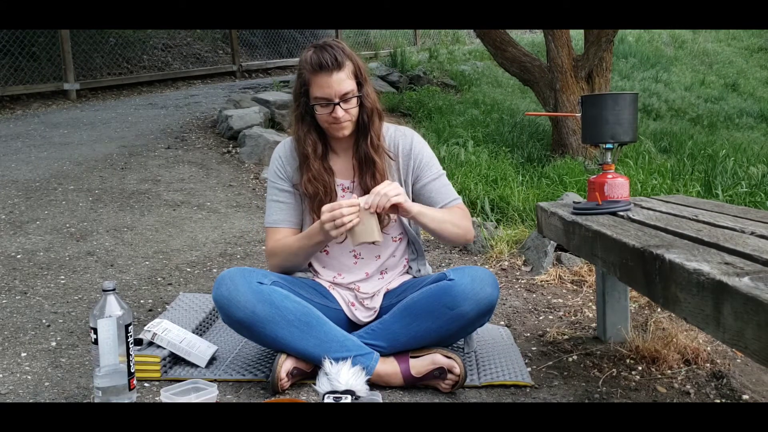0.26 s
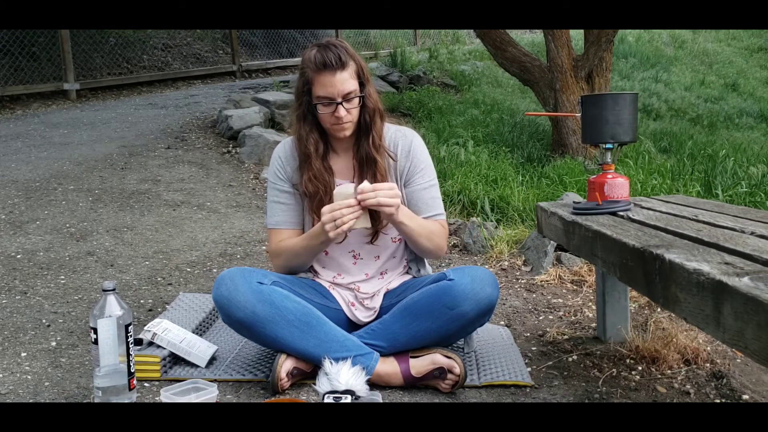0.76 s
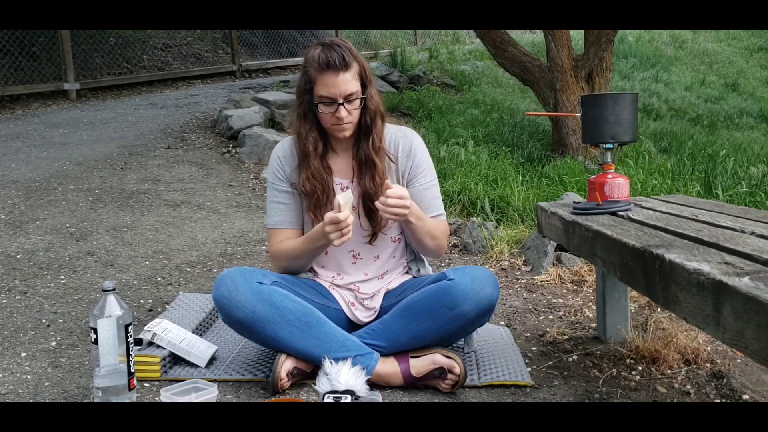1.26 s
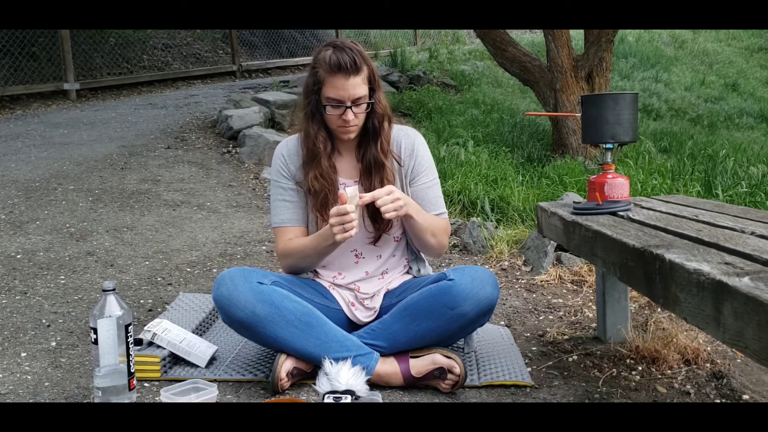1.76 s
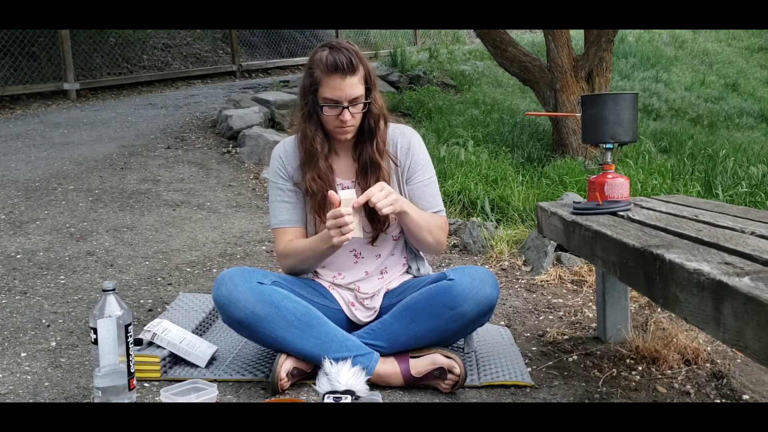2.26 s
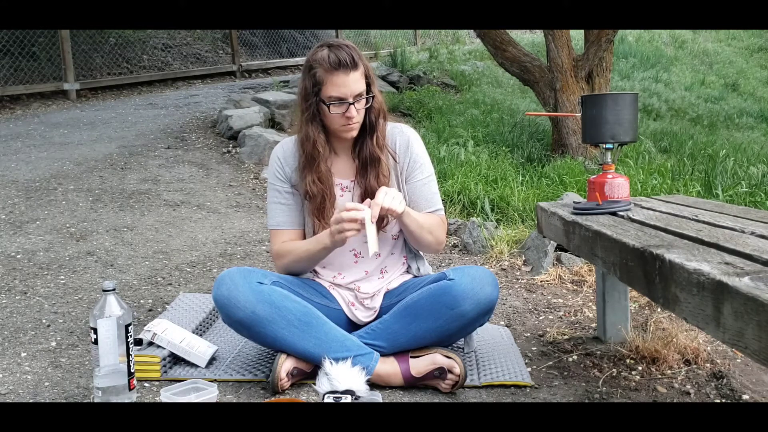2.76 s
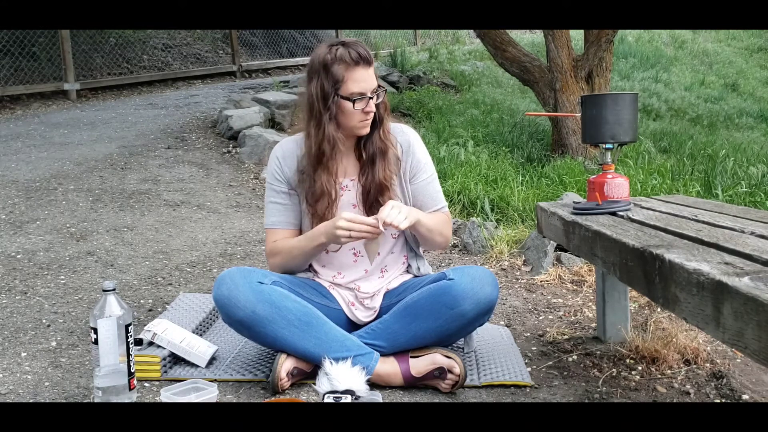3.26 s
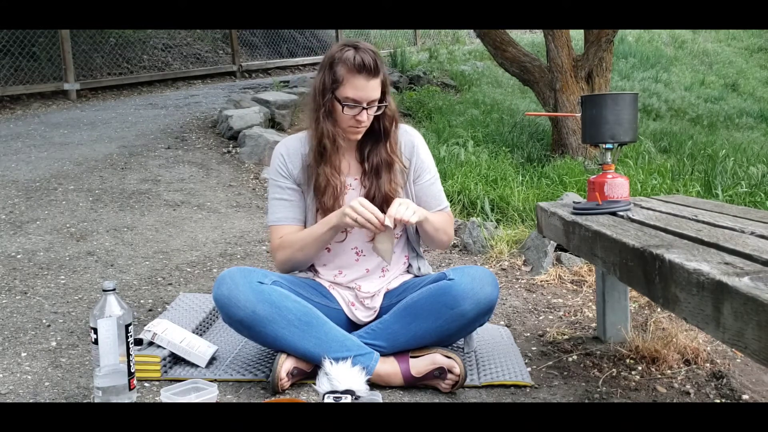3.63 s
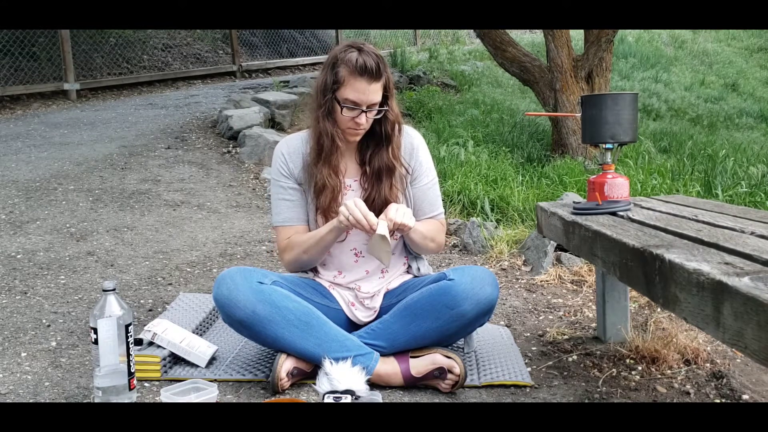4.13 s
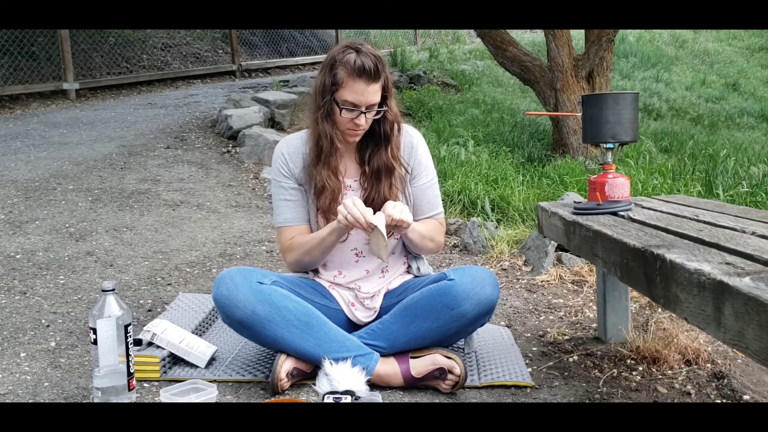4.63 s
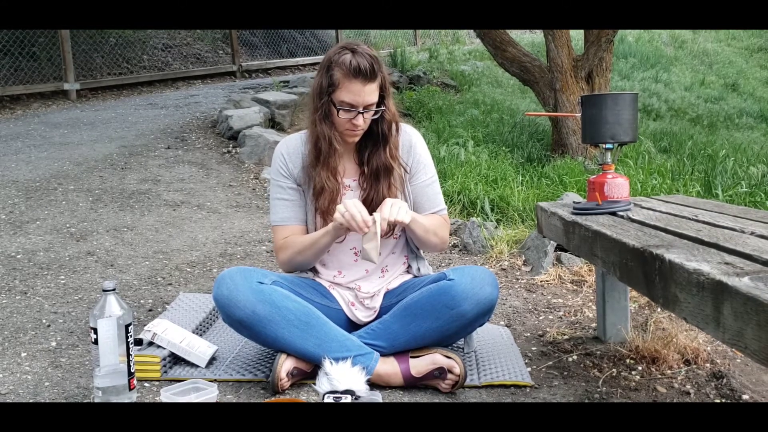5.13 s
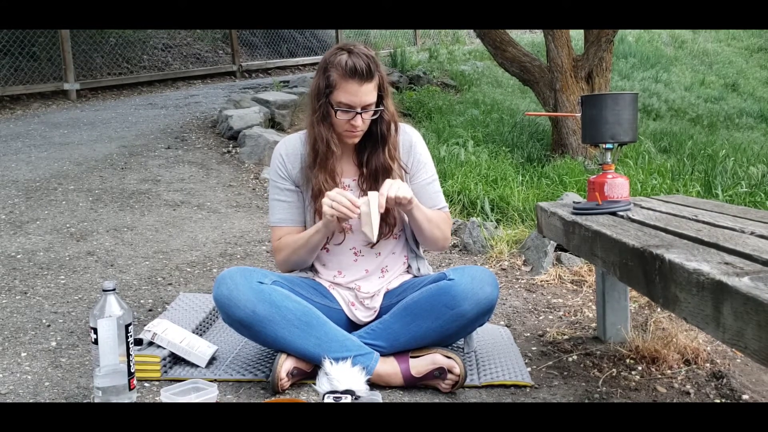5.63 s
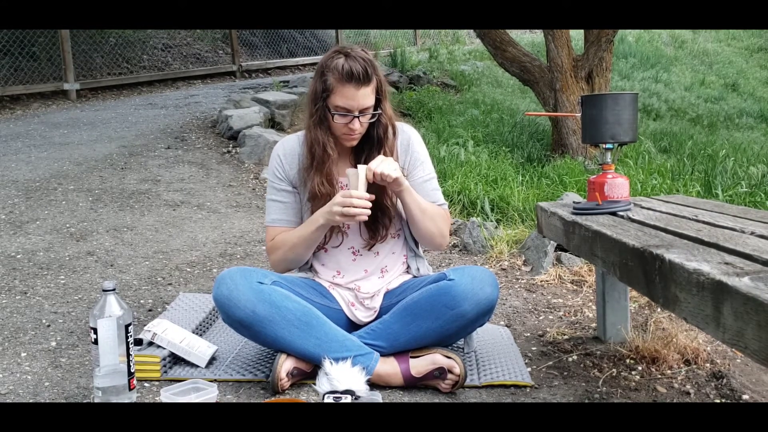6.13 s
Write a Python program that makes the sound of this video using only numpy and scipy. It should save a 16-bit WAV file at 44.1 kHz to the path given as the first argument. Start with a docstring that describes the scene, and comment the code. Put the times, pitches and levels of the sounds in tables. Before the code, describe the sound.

Fingers turn and tear a paper packet close by, with sharp crackles and faint rustles over the constant roar of a gas burner.

```python
"""Outdoors, a paper packet is turned in the fingers and torn open a little way from a stereo microphone.
Creases snap one by one: short noise bursts that ring the sheet. The packet knocks with dull thumps.
Fibres rip in short dense runs of noise, and sliding fingers rustle faintly.
Mostly to the right, a camping gas stove roars and hisses under a pot: three layers of coloured noise."""
import sys
import numpy as np
from scipy import signal
from scipy.fft import rfft, irfft
from scipy.io import wavfile
from scipy.ndimage import uniform_filter1d

SR = 44100
rng = np.random.default_rng(int(sys.argv[2]) if len(sys.argv) > 2 else 0)


def volts(x):
    """Linear amplitude factor 10**(x/20) for a level x in dB, scalar or array-like."""
    e = np.asarray(x, float) / 20
    return 10 ** e


def digitize_waveform(pressure):
    """Quantize a signal to 16-bit integers and store it at the path in sys.argv[1].

    Rows of a 2-D input are taken as channels; values are limited to [-1, 1].
    """
    field = np.atleast_2d(pressure).T
    bounded = np.clip(field, -1, 1)
    quanta = np.round(bounded * 32767).astype(np.int16)
    wavfile.write(sys.argv[1], SR, quanta)


N = 281793  # length in samples

# four bands of the paper's sound, from the dull body of the packet up to a bright tick:
# low edge f/Hz, high edge f/Hz, unshared (side) level/dB
PAPER_BANDS = [(197, 540, -19), (1097, 2660, -20.5), (2400, 7570, -11.5), (7580, 14150, -5)]


def colour(x, points):
    """Weights the spectrum of x by (f/Hz, level/dB) points."""
    hz, db = np.transpose(points)
    f = np.maximum(np.arange(N // 2 + 1) * SR / N, 1)
    gain_db = np.interp(np.log(f), np.log(hz), db)
    return irfft(rfft(x) * volts(gain_db), N)


def unit(x):
    """Scales the last axis to rms 1."""
    return x / np.sqrt(np.mean(x ** 2, axis=-1, keepdims=True))


def band(x, lo_hz, hi_hz, order=2):
    """Keeps the sound between two frequencies, along the last axis."""
    edges_hz = [lo_hz, min(hi_hz, .45 * SR)]
    return signal.sosfilt(signal.butter(order, edges_hz, "band", fs=SR, output="sos"), x)


def walk(rate):
    """A slowly wandering curve: random levels held 1 / rate s, then smoothed twice."""
    hold = int(SR / rate)
    steps = np.repeat(rng.standard_normal(N // hold + 1), hold)
    return 0.99 * uniform_filter1d(uniform_filter1d(steps, hold), hold)[:N]


def curve(rows):
    """Draws lines through the columns of a (t/s, value, ..) table, at every sample."""
    s, *columns = np.transpose(rows)
    return [np.interp(np.arange(N) / SR, s, c) for c in columns]


def ports(mid, side, side_db):
    """Makes left and right from a shared part and an unshared part."""
    return np.array([mid + volts(side_db) * side, mid - volts(side_db) * side])


def burner():
    """Gas flame under a pot: low flutter, roar against the pot and thin jet hiss, each swaying a little."""
    # spectra of the low flame flutter, the roar and the jet hiss: f/Hz, relative level/dB per Hz
    flame_points = [(15, 1), (30, -2), (54, -6), (100, -6.5), (170, 0.5), (220, 1), (300, -7.5), (430, -8),
                    (660, -16), (870, -8.5), (990, -16), (1300, -71)]
    roar_points = [(800, -50), (990, -9.5), (1150, -2.5), (1250, -2.5), (1520, 2.5), (1950, -0.5),
                   (2180, -2.5), (2400, 2), (2750, -3.5), (2980, -25), (3400, -68)]
    jet_points = [(2600, -40), (3000, 3), (3150, 3), (3900, 0.5), (4900, -6), (5400, -1.5), (5950, 6.5),
                  (6900, 1.5), (7600, 4.5), (8600, 2), (9700, 2.5), (10200, 9), (11200, -5.5), (15800, -19)]
    # spectrum, overall level/dB
    parts = [(flame_points, -53.5 + 0.54 * walk(9)),
             (roar_points, -53 + 0.62 * walk(10)),
             (jet_points, -56.5 + 1.2 * walk(9))]
    return sum(unit(colour(rng.standard_normal(N), points)) * volts(db) for points, db in parts)


def stove():
    """Direct burner noise, mostly stronger on the right, plus scattered sound the two sides do not share."""
    # balance of the direct sound: f/Hz, left minus right level/dB
    pan = [(60, -5.5), (1290, -2), (2380, -5), (4400, -3.5), (15000, 1.5)]
    # strength of the scattered sound: f/Hz, level/dB
    diffuse = [(30, -32), (60, -5), (250, -24.5), (640, -2.5), (1300, -25), (2200, -14), (3300, -19),
               (4500, -6), (15000, -9.5)]
    direct = burner()
    scattered = colour(burner(), diffuse)
    left = colour(direct, [(hz, db / 2) for hz, db in pan])
    right = colour(direct, [(hz, -db / 2) for hz, db in pan])
    return np.array([left + scattered, right - scattered])


def fibres(shape, scatter_db):
    """Noise of breaking fibres: most are faint, a few stand out."""
    return rng.standard_normal(shape) * volts(scatter_db * rng.exponential(size=shape))


def paper_band(x, k):
    """One band of the paper; neighbours alternate in sign so that they add where they meet."""
    lo_hz, hi_hz, _ = PAPER_BANDS[k]
    return (-1) ** k * unit(band(x, lo_hz, hi_hz))


def slides():
    """How hard the fingers work the packet: a smooth bump for each slide over a faint floor."""
    # fingers sliding on the packet: middle t/s, level/dB before the band shares, length t/s
    slide_rows = [(0.19, -61, 0.14), (0.427, -63.5, 0.17), (0.531, -57, 0.08), (0.692, -62, 0.048),
                  (1.097, -62, 0.052), (1.216, -59.5, 0.13), (1.321, -60, 0.088), (2.421, -60.5, 0.16),
                  (2.655, -57.5, .06), (2.85, -59.5, 0.15), (3.144, -58, 0.068), (3.426, -60, 0.2),
                  (3.729, -59.5, .05), (3.846, -60, .1), (3.981, -56.5, 0.11), (4.335, -50, 0.056),
                  (4.462, -60.5, 0.19), (4.922, -61, 0.085), (5.083, -58.5, 0.088), (6.281, -67, 0.086)]
    t = np.arange(N) / SR
    effort = volts(-75.5)
    for middle_s, db, length_s in slide_rows:
        effort = effort + volts(db) * np.exp(-(2 * (t - middle_s) / max(length_s, .01)) ** 2)
    return effort


def creases(count=50):
    """Time, four band levels and length of creases and thumps; faint creases crowd where fingers slide."""
    # creases that buckle: t/s, level/dB over 4 ms,
    # brightness (0 sheet ring, 1 crack, 2 tick), length t/ms
    snap_rows = [(.0126, -31.5, 8.5, 0.95), (.0158, -27.5, 0.1, 5.7), (.0787, -34, 1.5, 6),
                 (.099, -29, 0.9, 2.1), (.111, -25.5, 1.7, 1.8), (.2727, -41.5, -1.3, 3.3),
                 (.3343, -32.5, .7, 2.2), (.46, -41.5, 3, 2.2), (.495, -41, -1, 12),
                 (.5072, -29.5, 0.54, 5.2), (.5142, -29.5, 0.65, 1.15), (.5297, -41, -1, 1.6),
                 (.553, -34.5, 1.1, 1.7), (.573, -35.5, 0.5, 0.58), (.5896, -40, .5, 1.9),
                 (.679, -41.5, -0.4, 2.8), (.7521, -44.5, .1, 1.8), (.8271, -38.5, 2.2, 5.3),
                 (.8941, -36, 0.1, 2.5), (1.1159, -42.5, 0.5, 2.1), (1.1944, -48, 0, 1),
                 (1.2475, -47, 2.5, 1), (1.2926, -33.5, 1.2, 2.9), (1.321, -44, .8, 2),
                 (1.342, -42, 1.1, 1.5), (1.4098, -32, 1.0, 2.3), (1.4346, -44, 1, 1.8),
                 (1.4482, -37.5, 1.1, 1.9), (1.5047, -41.5, 8, 1.3), (2.1094, -37.5, 1.5, 1.54),
                 (2.3415, -46, 1.0, .9), (2.3842, -40, 1.5, 0.66), (2.4113, -39, 3, 2),
                 (2.435, -29, 2.5, 2.5), (2.5256, -39, 0.5, 4.5), (2.609, -40.5, 0.1, 0.53),
                 (2.6386, -35, 1.5, 3.8), (2.6639, -40.5, 0, 4.7), (2.7564, -33, 1.2, 0.95),
                 (2.787, -35, 1.5, 2), (2.8162, -27.5, 2.3, 1.6), (2.8478, -30, 1.5, 2.1),
                 (2.9015, -36, 1.3, 3.1), (3.044, -28, 1.44, 2.1), (3.2616, -33, 0.9, 1.5),
                 (3.379, -40, 0.3, 3.4), (3.4323, -41.5, .9, 3.3), (3.464, -32.5, 2.2, 0.4),
                 (3.7391, -44.5, .8, 2.5), (3.9498, -32.5, 2, 0.89), (3.9626, -39.5, -0.5, 1.7),
                 (3.9677, -35.5, 2.3, 1.1), (3.9836, -38.5, -1, 1.7), (4.002, -25.5, 3.1, 2.1),
                 (4.0232, -26, 3.5, 0.12), (4.0392, -39, .9, 7.2), (4.2597, -29, 1.5, 2.3),
                 (4.31, -30.5, 2, 1.9), (4.3418, -44, -1.5, 2.7), (4.3515, -40, -0.2, 3.1),
                 (4.4442, -35, 0.5, 1.7), (4.456, -37, -1.4, 9.5), (4.4859, -32.5, -0.1, 4.4),
                 (4.5047, -39.5, -0.2, 0.33), (4.5266, -31.5, .9, 2.4), (4.5792, -41, -0.2, 0.66),
                 (4.6265, -34, 0.7, 4.5), (4.647, -32.5, 0.6, 12), (4.793, -24, 0.5, 1.65),
                 (4.8002, -37, -0.4, 3.5), (5.0478, -40.5, .5, 6.8), (5.0551, -36, .5, 3.3),
                 (5.0611, -28.5, .9, 3.5), (5.0823, -35, 1.2, 1.2), (5.192, -47, 1.5, 2.2),
                 (5.2135, -32, 8, 0.45), (5.2325, -27, 1, 2.5), (5.2544, -26, .4, 13),
                 (5.2829, -29, 1.9, 1.4), (5.2966, -32, 1.0, 1.1), (5.3214, -33, 1.0, 1.1),
                 (5.3302, -33.5, -1.5, 3.3), (5.5288, -45.5, -1.7, 2.4), (5.6696, -40.5, 0.8, 1.3),
                 (6.1571, -44, 0, 0.61), (6.2686, -36, 0, 2), (6.2762, -41, 1.5, 3.6),
                 (6.287, -40, 1.9, 2.1)]
    # the packet's body knocks against the hand: t/s, level/dB
    thump_rows = [(0.013, -32.5), (0.104, -37.5), (0.2142, -41.5), (.8941, -42), (1.4482, -43.5),
                  (3.044, -41), (3.5671, -42), (3.9497, -43.5), (4.337, -46), (4.4859, -38), (5.3304, -33),
                  (6.287, -43)]
    faint_db, faint_scatter_db, faint_ms = -48, 3.0, 2.5  # loudest faint crease, spread below it, length
    focus_db = 3.5  # loss one step of brightness away from the crease's own; four times that at two steps
    thud_db, thud_dull_db = -14, 3.0  # packet body under a crease, and its loss per step of brightness
    thump_ms = 4.5

    busy = np.cumsum(slides() ** 2)
    chance = rng.random((count, 3))
    faint_s = np.searchsorted(busy, chance[:, 0] * busy[-1]) / SR
    faint_level_db = faint_db + faint_scatter_db * np.log(1 - chance[:, 1])
    faint = np.column_stack([faint_s, faint_level_db, 2 * chance[:, 2], np.full(count, faint_ms)])

    s, db, bright, ms = np.vstack([snap_rows, faint]).T[..., None]
    share_db = -focus_db * (np.arange(3) - bright) ** 2
    # the three shares add up to the whole power of the crease
    share_db = share_db - 10 * np.log10(np.sum(volts(share_db) ** 2, axis=1, keepdims=True))
    body_db = db + thud_db - thud_dull_db * bright
    folds = np.hstack([s, body_db, db + share_db, ms])
    # a thump is strongest in the lowest band
    knocks = [(t, level_db, level_db - 16, level_db - 25, level_db - 26, thump_ms)
              for t, level_db in thump_rows]
    return np.vstack([folds, knocks])


def snaps(size=1024):
    """Each crease or thump lets go at once, then crackles out; the ground sends it back just after."""
    # typical notes of a patch of sheet: f/Hz
    sheet_notes = (1903, 3150, 5060, 7890, 10920)
    ground_ms, ground_db = 1.8, -18.5  # delay and level of the ground echo
    rows = creases()
    length_ms = rows[:, 5:]
    t = np.arange(size) / SR
    fade = np.exp(-1.1 * t / (np.maximum(length_ms, .1) / 1000))
    push = np.moveaxis(fibres((len(rows), 2, size), 0.66), 1, 0) * fade
    # a quick crease puts most of its force in the first break
    push *= 1 + 3.7 / (1 + length_ms ** 2) * np.exp(-t / 0.00027)
    lag = int(ground_ms / 1000 * SR)
    push[..., lag:] += volts(ground_db) * push[..., :-lag]

    # the free patch of sheet differs each time, and so do its notes
    detune_octaves = .16 * rng.standard_normal((len(rows), len(sheet_notes)))
    notes_hz = np.array(sheet_notes) * 2 ** detune_octaves
    notes_hz = np.minimum(notes_hz, .4 * SR)[..., None]
    # higher notes die sooner
    note_fade = np.exp(-t * np.sqrt(notes_hz) / .042)
    ring = (note_fade * np.sin(2 * np.pi * notes_hz * t)).sum(axis=1)
    rung = push + .11 * signal.fftconvolve(push, ring[None], axes=2)[..., :size]

    sound = 0
    for k, (*_, side_db) in enumerate(PAPER_BANDS):
        mid, side = paper_band(rung, k) * volts(rows[:, k + 1:k + 2])
        sound = sound + ports(mid, side, side_db)
    sound = sound * np.sqrt(SR / 250 / size)  # levels count over 4 ms, not over the whole burst
    out = np.zeros((2, N + size))
    for k, s in enumerate(rows[:, 0]):
        start = int(s * SR)
        out[:, start:start + size] += sound[:, k]
    return out[:, :N]


def paper_noise(shares_db, ring_db, scatter_db, rate, judder_db):
    """A dense run of fibre clicks through the sheet and its lowest note, juddering as it catches and gives."""
    push = fibres((2, N), scatter_db) * volts(judder_db * walk(rate))
    push += 1.3 * signal.lfilter(*signal.iirpeak(1800, 5, SR), push)  # the lowest note, near 1800 Hz
    out = 0
    for k, (*_, side_db) in enumerate(PAPER_BANDS):
        # the sheet ring lifts the two lowest bands only
        level_db = shares_db[k] + (k < 2) * ring_db + 2 * walk(rate / 2)
        mid, side = paper_band(push, k) * volts(level_db)
        out = out + ports(mid, side, side_db)
    return out


def rips():
    """The tear runs in four pulls: each swells, sags and stops short."""
    # rips through the paper: start t/s, loudest t/s, stop t/s, level/dB before the band shares,
    # sag to the stop level/dB, sheet ring level/dB over the rest
    pull_rows = [(.035, .07, .13, -51, 9, 1.5), (.79, .875, .894, -50, 2, -5),
                 (4.61, 4.625, 4.7, -53.5, 13, 0), (5.16, 5.245, 5.297, -47.5, 3, 2.5)]
    # share of each paper band: level/dB
    rip_shares = (-1, 9, 8.5, 7.5)
    rise_db, stop_s = 21, .006  # swell from the start, time to fall silent
    pulls = []
    for start, top, stop, db, sag_db, ring_db in pull_rows:
        pulls.append(curve([(start - .02, -99, 0),
                            (start, db - rise_db, ring_db),
                            ((start + top) / 2, db - rise_db / 4, ring_db),
                            (top, db, ring_db),
                            (stop, db - sag_db, ring_db),
                            (stop + stop_s, -99, 0)]))
    level_db = np.max([db for db, _ in pulls], axis=0)
    ring_db = np.sum([ring for _, ring in pulls], axis=0)
    return volts(level_db) * paper_noise(rip_shares, ring_db, scatter_db=3, rate=260, judder_db=4.2)


def rustle():
    """Faint crackle that swells and fades with each slide of the fingers."""
    # share of each paper band: level/dB
    rustle_shares = (-1.3, 1.1, -0.6, -1.6)
    return slides() * paper_noise(rustle_shares, 0, scatter_db=3, rate=150, judder_db=3)


def scene():
    """Stove mostly to the right, packet in front."""
    return stove() + snaps() + rips() + rustle()


def low_pass(x):
    """Removes everything above the highest recorded frequency."""
    return signal.sosfilt(signal.butter(12, 16820, fs=SR, output="sos"), x)


def record(dry):
    """The recorder drops the very top with a steep low-pass filter."""
    top_hz = 15700
    dull = signal.sosfilt(signal.cheby1(10, .5, top_hz, fs=SR, output="sos"), dry)
    return low_pass(dull)


dry = scene()
out = record(dry)
digitize_waveform(out)
```